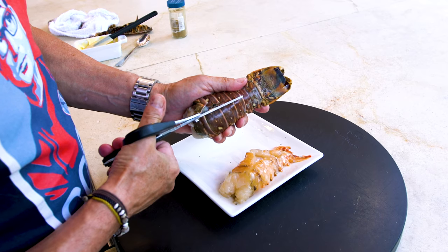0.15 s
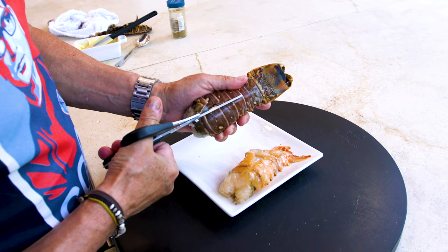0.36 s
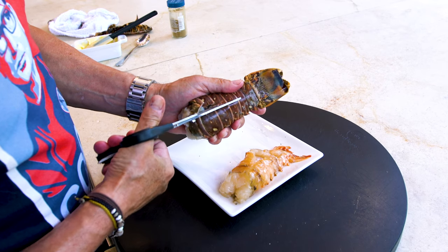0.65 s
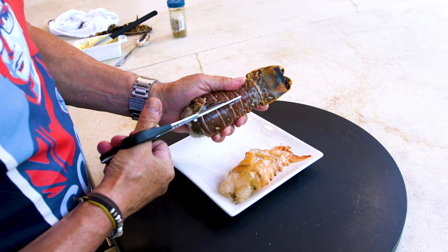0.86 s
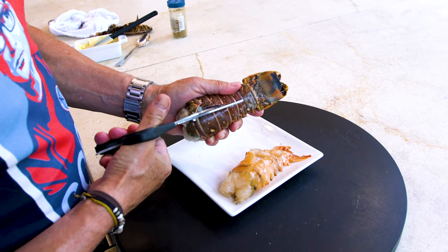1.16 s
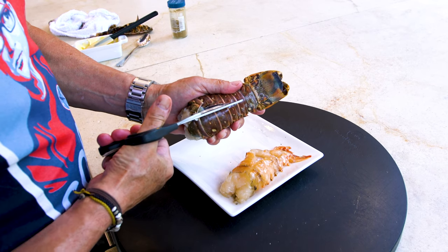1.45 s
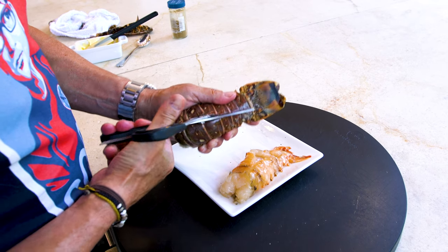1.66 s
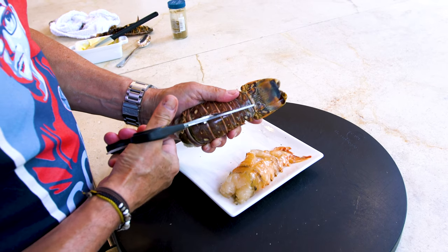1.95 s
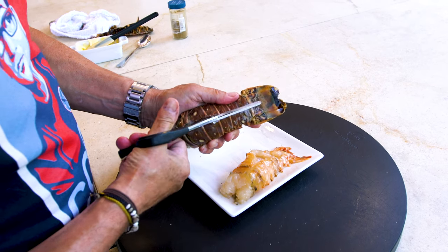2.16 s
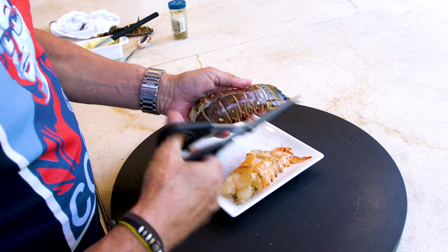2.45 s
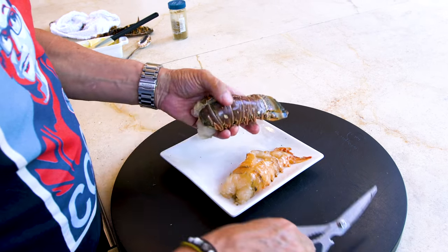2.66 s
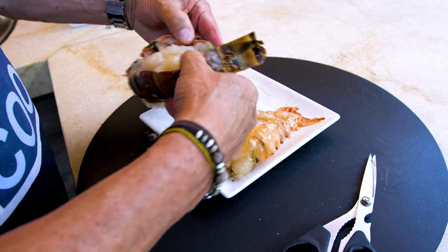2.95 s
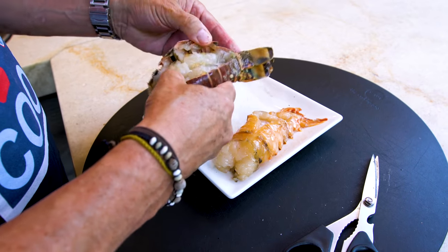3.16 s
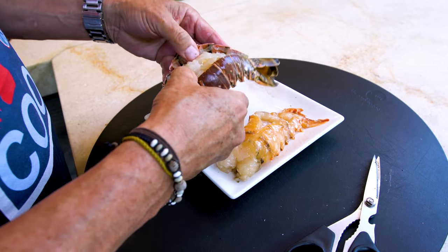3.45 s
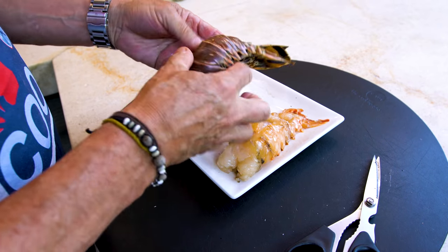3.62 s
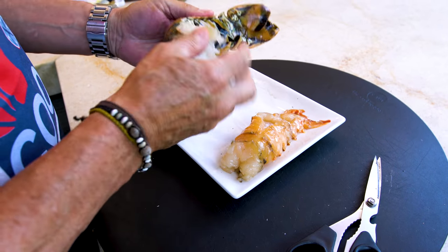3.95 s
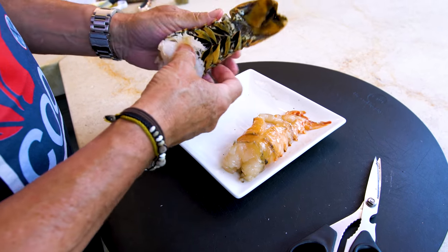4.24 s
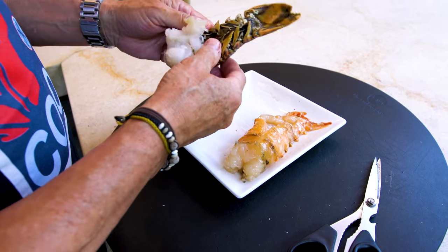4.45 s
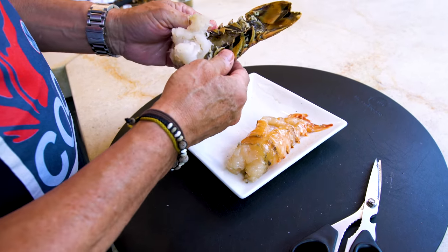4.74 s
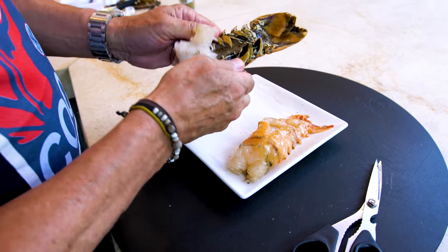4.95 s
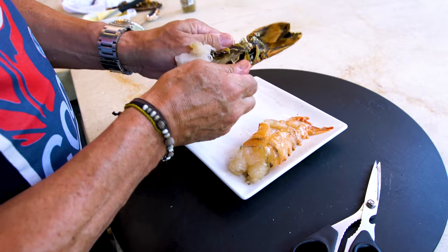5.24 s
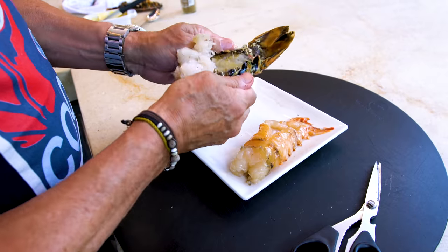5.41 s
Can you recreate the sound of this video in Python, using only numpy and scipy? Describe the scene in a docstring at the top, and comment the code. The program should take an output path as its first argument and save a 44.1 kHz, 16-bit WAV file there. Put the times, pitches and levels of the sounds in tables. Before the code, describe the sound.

Kitchen shears crunch through a hard lobster shell in sharp irregular cracks, then fingers pry it with faint ticks as a low motor hum swells.

```python
"""Opening a hard shell in the kitchen

Kitchen shears bite through a hard shell, then fingers pry it open, close to the microphone in a quiet kitchen.
The shell gives way in short bursts: random clicks make the shell's resonances ring, and reflections follow.
Under each effort it creaks and ticks faintly, from filtered random grains and very weak cracks.
A motor hum, built from steady sine tones, grows louder half way; filtered noise is the room's rumble and hiss.
"""
import sys
import numpy as np
from scipy import signal
from scipy.io import wavfile

SR = 44100
rng = np.random.default_rng(int(sys.argv[2]) if len(sys.argv) > 2 else 0)


def wav_record(signal):
    """Record a signal, one row per channel, as 16-bit PCM in the file named by sys.argv[1]."""
    frames = np.transpose(np.atleast_2d(signal))
    bounded = np.clip(frames, -1, 1)
    # unit amplitude maps onto the largest positive 16-bit level
    quanta = np.round(bounded * 32767).astype(np.int16)
    wavfile.write(sys.argv[1], SR, quanta)


N = 246033
TIME_S = np.arange(N) / SR
SHEARS_DOWN_S = 2.45   # the shears are laid aside; fingers pry from here on


def from_db(db):
    """Turn a level in dB into a factor to multiply a sound by."""
    return 10 ** (np.asarray(db) / 20)


def rms_one(x):
    """Scale a signal to an rms (average strength) of 1."""
    return x / np.sqrt(np.mean(x ** 2) + 1e-20)


def band(x, low_hz, high_hz, order=2):
    """Keep only the pitches between two limits, with a Butterworth filter."""
    return signal.sosfilt(signal.butter(order, [low_hz, high_hz], "band", fs=SR, output="sos"), x)


def drift(rate_hz):
    """A slow random wander of rms 1: smoothed noise, made at every 40th sample and joined by lines."""
    r = np.exp(-80 * np.pi * rate_hz / SR)
    noise = rng.standard_normal(N // 40 + 2002)
    slow = signal.lfilter([1], [1, -2 * r, r * r], noise)[2000:]   # drop the filter's start-up
    return np.interp(np.arange(N) / 40, np.arange(len(slow)), rms_one(slow))


def grains(size, per_s, spread_db):
    """Clicks at random moments, of uneven size and random sign."""
    born = rng.random(size) < per_s / SR
    sizes = from_db(spread_db * np.minimum(rng.exponential(1, size), 4))
    return born * sizes * rng.choice([-1, 1], size) + 1e-18


def cut_then_pried(cut_db, pried_db):
    """One level while the shears cut, another while the fingers pry."""
    return np.where(TIME_S < SHEARS_DOWN_S, cut_db, pried_db)


# balance of low and high pitches in the room's air: (frequency [Hz], relative level [dB per Hz])
AIR_BALANCE = [(18, 0.5), (30, -18.5), (60, -5.5), (85, -1.5), (130, -5.5), (250, -9), (500, -14),
               (1000, -19), (2000, -27.5), (3000, -37.5), (6000, -39), (9000, -44.5), (13000, -50)]


def air(level_db, top_hz, above_top_db, patchy_db):
    """Room rumble and hiss: noise in half-octave bands, each flickering a little, thinner above a top."""
    white = rng.standard_normal((2, N))   # neighbouring bands take different noise
    hz, balance_db = np.transpose(AIR_BALANCE)
    edges_hz = 20 * 2 ** np.arange(0, 9.6, .5)
    noise = 0
    for k, (low_hz, high_hz) in enumerate(zip(edges_hz, edges_hz[1:])):
        middle = np.log(low_hz * high_hz) / 2
        gain_db = np.interp(middle, np.log(hz), balance_db) + patchy_db * drift(0.58)
        noise = noise + from_db(gain_db) * band(white[k % 2], low_hz, high_hz)
    below = signal.sosfiltfilt(signal.butter(8, top_hz, fs=SR, output="sos"), noise)
    return from_db(level_db) * rms_one(below + from_db(above_top_db) * (noise - below))


# loudness of the whole hum, before each tone's own level is added: (time [s], level [dB])
MOTOR_LEVEL = [(0, -69), (1.4, -71.5), (2.81, -76), (2.87, -60), (4.0, -60), (4.6, -60), (5.2, -62.5),
               (5.58, -66.5)]
# the steady tones of the hum: (frequency [Hz], level over the hum level [dB])
MOTOR_TONES = [(80.6, -11), (161.1, 3), (241.7, -8), (322.3, -12.5), (480, -15.5)]


def motor():
    """An appliance motor: steady sine tones whose strengths waver a little."""
    hum_db = np.interp(TIME_S, *np.transpose(MOTOR_LEVEL))
    hum = 0
    for hz, tone_db in MOTOR_TONES:
        strength = from_db(tone_db + 0.4 * drift(6))
        hum = hum + strength * np.sin(2 * np.pi * hz * TIME_S + rng.uniform(0, 2 * np.pi))
    return np.sqrt(2) * from_db(hum_db) * hum   # a sine's rms is its peak / sqrt(2)


REST_DB = -86   # faint level between efforts
# the hands strain on the shell: (time of full strength [s], time held [s], level [dB])
HAND_EFFORTS = [(0.0, 0.15, -78.5), (0.2, 0.098, -70.5), (0.392, .09, -69), (0.58, 0.19, -78),
                (0.788, 0.036, -64.5), (1.0, 0.08, -75.5), (1.299, 0.074, -71.5), (1.442, 0.024, -72),
                (1.691, 0.06, -62.5), (2.06, .06, -65), (2.128, 0.043, -57), (2.238, 0.066, -71.5),
                (2.47, 0.11, -77), (2.848, 0.14, -75.5), (3.102, 0.16, -79), (3.379, 0.12, -74),
                (3.57, .09, -75.5), (3.72, 0.15, -85), (3.917, 0.06, -79), (4.101, 0.089, -75),
                (4.412, 0.11, -74.5), (4.6, 0.091, -85), (4.78, .07, -80.5), (4.947, 0.2, -76),
                (5.31, 0.074, -71), (5.41, .05, -69.5), (5.48, 0.06, -67)]


def effort_db():
    """Each effort rises, is held and falls back to a faint rest level."""
    rise_db_per_s, fall_db_per_s = 423, 259
    out = np.full(N, float(REST_DB))
    for s, held_s, level_db in HAND_EFFORTS:
        before_db = rise_db_per_s * np.maximum(s - TIME_S, 0)
        after_db = fall_db_per_s * np.maximum(TIME_S - s - held_s, 0)
        out = np.maximum(out, level_db - before_db - after_db)
    return out


# creaking grains by size: (low edge [Hz], high edge [Hz], level over the effort [dB])
GRAIN_BANDS = [(1230, 1845, -10.5), (1800, 3000, -3.5), (3200, 4850, -5), (4650, 7000, -3.5)]


def creak(fine_cut_db, fine_pried_db):
    """Fine grains of shell and wet flesh moving; each size has clumps of its own that come and go."""
    shared = drift(18)
    finest = (7120, 12000, cut_then_pried(fine_cut_db, fine_pried_db))
    out = 0
    for low_hz, high_hz, level_db in GRAIN_BANDS + [finest]:
        clumps = from_db(2.5 * shared + 3.5 * drift(40))
        rustle = band(grains(N, 2500, 4.5) * clumps, low_hz, high_hz, order=3)
        out = out + from_db(level_db) * rms_one(rustle)
    return from_db(effort_db()) * out


def ticks(count, middle_db, spread_db, length_ms):
    """Rows of faint cracks at random moments, likelier under effort, laid out like the crack table."""
    odds = np.cumsum(np.clip(effort_db() - REST_DB, 0, 12) + 1)
    when, low, mid, high, size, body, splinters = rng.random((count, 7)).T
    s = np.interp(when * odds[-1], odds, TIME_S)
    pitches_hz = 1400 * 2 ** low, 3300 * 2 ** mid, 7500 * 1.7 ** high
    edge_db = middle_db + spread_db * (2 * size - 1)
    same = np.ones(count)
    return list(zip(s, length_ms * same, *pitches_hz, edge_db,
                    -20 * same, 6 - 24 * body, 6 - 24 * splinters))


# the pitches at which the shell rings, before each crack changes them:
# (frequency [Hz], width [Hz], kept within 330 to 1100 when played, level [dB])
SHELL_RESONANCES = [(1250, 290, -20.5), (1640, 310, -1.5), (1856, 270, 6), (2500, 294, 3), (2740, 510, 7),
                    (3660, 540, 9), (4020, 1400, -6), (4870, 680, 6), (5410, 1400, 2.5), (7090, 1900, 4),
                    (7990, 895, 5), (8600, 590, -30), (9580, 170, 2), (10270, 990, 7), (13600, 1800, -14)]


def shell(x, strengths_db, shifts, direct):
    """The shell's resonances ring side by side, with a share of the bare click."""
    out = direct * signal.lfilter([.5, .5], 1, x)
    for (hz, width_hz, level_db), strength_db, shift in zip(SHELL_RESONANCES, strengths_db, shifts):
        r = np.exp(-np.pi * np.clip(width_hz, 330, 1100) / SR)   # a wider resonance dies sooner
        b = np.sqrt(1 - r * r) * np.array([1, 0, -1]) / 2
        a = [1, -2 * r * np.cos(2 * np.pi * hz * shift / SR), r * r]
        out = out + from_db(level_db + strength_db) * signal.lfilter(b, a, x)
    return out


# the shell gives way: (time [s], length [ms], body pitch [Hz], edge pitch [Hz], splinter pitch [Hz],
# edge level [dB], knock over edge [dB], body over edge [dB], splinters over edge [dB])
SHELL_CRACKS = [(0.0945, 3, 2840, 4600, 8050, -59, -15.0, 0, -29),
                (0.1952, 0.72, 1310, 4600, 11530, -58, -15.0, -10, -1),
                (0.2052, 1.3, 2290, 6000, 7890, -60, -16.0, -1, 5.5),
                (0.2092, 0.8, 2410, 5740, 8130, -62.5, -17, 3, 3.5),
                (0.2196, 4.9, 1640, 5680, 11800, -66.5, -10, 3, 4),
                (0.246, 3.5, 1750, 5030, 7920, -58, -18.0, -19.5, -6.0),
                (0.279, 1.8, 1790, 5890, 8540, -68, -15.0, 3, 4),
                (0.308, 1.26, 2050, 6150, 9240, -45, -24.5, -7, -6),
                (0.341, 3.5, 2700, 5800, 8500, -48.5, -26, -7, -4.5),
                (0.376, 2.64, 2860, 3450, 9300, -37.5, -16, 0.5, -4),
                (0.3789, 2.3, 2870, 5860, 11860, -41.5, -10.5, -2.5, 1),
                (0.399, 2.0, 2820, 5900, 8450, -45, -34, -8, -8),
                (0.4036, 1.5, 2270, 3760, 8500, -55, -28, 2.0, 5),
                (0.408, 3.0, 2790, 3950, 10770, -62, -18.0, -5, 4),
                (0.431, 3.9, 3030, 5500, 10840, -39.5, -44, -4.5, -4.5),
                (0.4762, 2.1, 1730, 4750, 9200, -55, -16, -3, -5),
                (0.5813, 1.5, 1690, 4340, 8480, -68.5, -17, 13, -4),
                (0.724, 2.2, 2440, 5430, 8140, -66, -15.0, 5, -16.5),
                (0.7673, 2.5, 1520, 5800, 8660, -43, -6, -4.5, -1.5),
                (0.7839, 1.6, 1410, 6450, 8800, -33, -27, -6.5, -6.5),
                (0.7861, 5, 1790, 6300, 12700, -38, -11.5, 3, 1),
                (0.8185, 5.5, 2680, 5900, 8800, -72, -16.5, -19, 17.5),
                (0.8331, 5.3, 2410, 4870, 9220, -34, -13.5, -0.5, 1.5),
                (0.9739, 0.73, 2070, 4960, 10500, -70.5, -15.0, 17, -19.5),
                (1.002, 1.3, 1870, 4270, 8030, -79.5, -13, 22.0, -13),
                (1.0365, 0.89, 2320, 3370, 8000, -54, -12, 2.5, -11),
                (1.056, 4.6, 1690, 5400, 7200, -49.5, -18, 1.5, -2.5),
                (1.071, 1, 1350, 3540, 7660, -53.5, -23, -9, -1),
                (1.165, 6.0, 1580, 6560, 9680, -86.5, -15.0, -7, 11.5),
                (1.296, 0.9, 1440, 3340, 9560, -63.5, -18, -3, 11),
                (1.3085, 5.7, 1460, 5900, 8380, -48.5, -14, 0.5, -5),
                (1.3178, 0.54, 2540, 6120, 8030, -48, -1, 4.5, -2),
                (1.321, 5.3, 1770, 3510, 9730, -60, -13, 2.0, 5),
                (1.335, 2.2, 2420, 6640, 7890, -62, -15.0, -10, 1),
                (1.3518, 1.7, 2580, 6700, 7710, -58.5, -5, 1, 0),
                (1.366, 1.2, 1040, 6140, 7810, -61.0, -15.0, -12, 2.0),
                (1.3804, 1, 2480, 6700, 7300, -44.5, -27, -11, -1),
                (1.3917, 1.1, 1260, 6440, 7710, -72.0, -15.0, -7.0, 13),
                (1.436, 0.88, 1130, 4850, 8100, -65, -15.0, -16.0, 6),
                (1.4526, 4.2, 2460, 5300, 7800, -41, -24, -4.5, -3),
                (1.5087, 2.5, 2030, 3360, 7800, -59.5, -23, -2, -11),
                (1.6126, 1.4, 990, 5560, 11010, -64.5, -1, -14.5, -6),
                (1.673, 1.7, 2800, 3420, 8200, -52, -24, 0, -9),
                (1.6803, 0.8, 1490, 5370, 12340, -71, -15.0, -5, 12),
                (1.6877, 1.0, 1100, 5280, 11800, -68.5, -15.0, -6, 10),
                (1.6984, 1.1, 1440, 6300, 9290, -63, -18.0, -1.0, 12),
                (1.7027, 0.7, 1970, 6370, 12090, -69, -17, -15.5, 9),
                (1.7057, 0.7, 2050, 6030, 7920, -74, -15.0, 0.5, 10),
                (1.712, 3.2, 1300, 5970, 8660, -46.5, -13, -5, 3),
                (1.7157, 0.97, 1960, 6500, 8900, -49.5, -18, 0, 11.5),
                (1.717, 2.2, 1890, 4750, 9000, -43.5, -22, -4, -1),
                (1.7208, 2.7, 2820, 5650, 7800, -53.5, -2, -6, 2.0),
                (1.7312, 3.1, 1320, 4820, 7710, -51.0, -13, 3, -1.0),
                (2.0484, 5, 1280, 6600, 12000, -38.5, -4, 2, 0),
                (2.055, 4.4, 2370, 4750, 8800, -35, -17.5, -3.5, -2.5),
                (2.0968, 1.6, 1360, 5400, 10100, -42.5, -15.0, -4, -7),
                (2.1217, 4.1, 1390, 6160, 8600, -36, -10, -6, -2.5),
                (2.1247, 6.8, 2900, 5950, 7600, -39.5, -19, 1.0, 0.5),
                (2.1483, 4.5, 2700, 5540, 7640, -36.5, -20, 0.5, -2),
                (2.152, 2.5, 1170, 5640, 7810, -32, -19, -13, -9),
                (2.1659, 1.4, 2590, 5800, 8300, -30.5, -33, -1, -19),
                (2.167, 4, 2440, 4340, 8700, -35.5, -27, -7, -3.5),
                (2.1709, 6.5, 2800, 5300, 8870, -45, -30, 5.5, -12),
                (2.1779, 3.2, 1950, 5210, 7850, -41, -33.5, -5, -6.0),
                (2.182, 2.9, 1800, 5700, 7900, -41, -36, -12, -21),
                (2.189, 3.2, 1800, 3970, 7710, -49, -27.5, -10, -17),
                (2.2588, 1.13, 2000, 3640, 12900, -50.5, -26.0, -6, -5),
                (2.3557, 12.4, 2370, 5500, 8800, -51, -14, 5.5, -4),
                (2.3778, 1.6, 2350, 3310, 7710, -55, -18, 6, -4.0),
                (2.3825, 5.1, 2420, 6000, 7710, -58.5, -22, 1, -10),
                (2.8506, 0.85, 1270, 3660, 7710, -71.5, -12, 11, 3),
                (2.94, 4.0, 2450, 3460, 10900, -61.5, -1, -1.0, -3),
                (3.1395, 2.3, 1180, 3410, 10150, -78, -18, 13, -6),
                (3.39, 2.0, 990, 4230, 8340, -75.5, -15.0, 12.5, -6),
                (3.4897, 0.91, 1384, 3310, 13280, -68, -14, 6, 0.0),
                (3.581, 2.4, 1060, 5200, 8450, -65, -15.0, -6, -3.5),
                (3.6294, 6.0, 2670, 3380, 8300, -73, -15.0, 9.5, -1),
                (3.6463, 2.4, 1060, 3560, 12000, -71.5, -15.0, 11, 3),
                (3.738, 1.6, 990, 5840, 8660, -65.5, 4, -10, -3),
                (3.8324, 1.4, 1350, 4570, 12250, -82, -14, 10, 15),
                (3.9248, 0.56, 2000, 3570, 8320, -61, -14, 5.5, -12),
                (3.9583, 1.5, 990, 6250, 11400, -60.5, -12, -4, -1),
                (4.0448, 1.3, 990, 6200, 11800, -73.5, -15.0, 11, 11),
                (4.0588, 1.6, 1830, 4520, 7860, -74.5, -18, 18, -11),
                (4.1046, 0.83, 2030, 3740, 8230, -57.5, -20, 1.5, -2),
                (4.1565, 3.3, 1980, 3650, 7800, -64.5, -12, 0, -13),
                (4.285, 2.6, 990, 6240, 13080, -73.5, -15.0, 1, 0),
                (4.4046, 1.2, 990, 5730, 7710, -64, -15.0, 0, -18),
                (4.4115, 1.7, 1300, 5120, 8520, -65.5, -13, -1.0, -12.0),
                (4.421, 4.7, 1280, 6270, 10990, -72.5, -14, -7, 8),
                (4.4422, 0.6, 1290, 4910, 7800, -58.0, -19.5, -6, -21),
                (4.4575, 0.6, 990, 4820, 8960, -65.0, -15.0, -14.5, -16.0),
                (4.501, 0.45, 2760, 4840, 8800, -55, -21, -11, -14),
                (4.5271, 0.63, 1630, 4660, 7800, -56.5, -21, 2.5, -16),
                (4.5522, 0.55, 990, 5090, 7500, -52.5, -23, -19.5, -24),
                (4.6128, 0.96, 2550, 3900, 8350, -59.5, -6, -3, -25),
                (4.6265, 0.8, 1700, 3930, 7710, -60, -17.0, -3.0, -19.5),
                (4.6394, 0.7, 990, 5600, 12460, -59.5, -22, -20.5, -21.5),
                (4.6595, 0.6, 996, 4510, 12500, -59.5, -16, -16, -25.5),
                (4.6771, 1.1, 2350, 6040, 7800, -63, -14, 4.5, -20),
                (4.7163, 1.2, 970, 3530, 11990, -94, -15.0, 6, 19),
                (4.8363, 0.7, 2310, 5500, 8700, -61, -15.0, 4, -19),
                (5.0257, 2.5, 2000, 4070, 8630, -70.5, -16, 10, -27),
                (5.1004, 1.7, 980, 3820, 7800, -73, -20, 7, -28),
                (5.2929, 0.84, 1670, 4700, 8000, -50.5, -22, 6.5, -29),
                (5.3139, 1.95, 1670, 5600, 7800, -38.5, -27.0, 0, -11.5),
                (5.336, 5.8, 1430, 5880, 7710, -62.5, -13, 2, -12),
                (5.3449, 1.0, 2020, 3310, 7710, -59.5, -20, 7.5, -16),
                (5.3619, 0.8, 2840, 3310, 7710, -63, -15.5, 8, -18),
                (5.3706, 1.2, 2840, 3310, 7710, -69, -15.0, 11, -20.5),
                (5.402, 2.6, 1590, 4010, 7710, -80.5, -15.0, 14, -7.5),
                (5.4163, 1.8, 1920, 3310, 8200, -71.5, -15.0, 14.5, -19.0),
                (5.427, 2.2, 2720, 5680, 7920, -63, -15.0, 3, -14.0),
                (5.4453, 4.2, 1380, 3310, 8850, -68, -17, 7, -13),
                (5.464, 5, 1710, 3420, 7710, -71, -15.0, 17, -14.0),
                (5.4895, 0.93, 1540, 4200, 8600, -63, -16, 11.5, -23.5),
                (5.506, 1.3, 2000, 4150, 8320, -60, -18, 6, -16.0),
                (5.513, 1.3, 1510, 4200, 11740, -54.5, -21, 9, -15),
                (5.5242, 2.7, 1960, 5600, 8200, -52, -19, -2, -23),
                (5.546, 1.4, 1750, 5850, 7710, -80.0, -15.0, 20, -6.0),
                (5.569, 1.8, 1950, 6470, 7650, -52.5, -22, 1, -17),
                (5.5728, 1.1, 1940, 5240, 7800, -45, -26, 5, -14)]
# parts of a crack, in the order knock, body, edge, splinters: (low edge [Hz], high edge [Hz])
CRACK_PARTS = [(350, 800), (950, 3000), (3000, 7000), (7000, 14500)]


def cracks(swell, lead, lead_share, fall_ms, direct, off_pitch_db, on_pitch_db):
    """Each crack: a short swell of clicks, a dense burst of snaps, a quick fall."""
    before, size = 400, 1500   # samples ahead of the first snap, and in all
    shift_share = .07   # the resonances shift at random from crack to crack, so no two ring alike
    splinter_reach = 1.55   # a crack fades above this multiple of its splinter pitch
    out = np.zeros(N + size + before)
    ms = (np.arange(size) - before) * 1000 / SR
    shell_hz, _, shell_db = np.transpose(SHELL_RESONANCES)
    filters = [signal.butter(3, edges_hz, "band", fs=SR, output="sos") for edges_hz in CRACK_PARTS]
    faint = ticks(count=30, middle_db=-74, spread_db=3, length_ms=1.5)
    for s, length_ms, *pitches_hz, edge_db, knock_db, body_db, splinters_db in SHELL_CRACKS + faint:
        # a long crack swells and ebbs as it runs
        arch = 1 - swell * np.cos(2 * np.pi * np.clip(ms / length_ms, 0, 1)) * min(length_ms / 8, 1)
        shape = arch * np.exp(-np.maximum(ms - length_ms, 0) / fall_ms)
        lead_in = np.exp(ms / (lead_share * max(length_ms, 3)))
        shape = np.where(ms < 0, lead * np.clip(length_ms / 4, .3, 1) * lead_in, shape)
        force = grains(size, per_s=16000, spread_db=4.2)
        force[before] = 3 + 15 / length_ms   # the first snap is nearly all of a short tick
        blow = force * shape

        # the pieces that break ring clearest, their neighbours less the further off they lie
        octaves = abs(np.log2(shell_hz / np.array(pitches_hz)[:, None]))
        strengths_db = -off_pitch_db * octaves.min(axis=0) + 3 * rng.standard_normal(len(shell_hz))
        shifts = 1 + shift_share * rng.uniform(-1, 1, len(shell_hz))
        nearest = octaves.argmin(axis=1)
        shifts[nearest] = pitches_hz / shell_hz[nearest]
        strengths_db[nearest] = on_pitch_db - shell_db[nearest]
        ringing = shell(blow, strengths_db, shifts, direct)
        top_hz = min(splinter_reach * pitches_hz[-1], 15000)
        ringing = signal.sosfilt(signal.butter(3, top_hz, fs=SR, output="sos"), ringing)

        # set the level of each part by its strength during the burst
        at = round(s * SR)
        levels_db = edge_db + np.array((knock_db, body_db, 0, splinters_db))
        for sos, (low_hz, _), level_db in zip(filters, CRACK_PARTS, levels_db):
            part = signal.sosfilt(sos, ringing if low_hz > 500 else blow)   # the knock is the bare blow
            burst = (ms > 0) & (ms < max(length_ms + .4, 1000 / low_hz))
            out[at:at + size] += from_db(level_db) * part / np.sqrt(np.mean(part[burst] ** 2))
    return out[before:before + N]


def push(crack, cut_db, pried_db):
    """A low push that follows each crack's size, then swings back, stronger while the blades cut."""
    size = np.abs(crack) * from_db(cut_then_pried(cut_db, pried_db))
    return band(size, 28.08, 350, order=1)


def kitchen(x, early_db, early_t60, late_db, late_t60):
    """Dense reflections: a quick cloud from table and hands, a fainter, longer one from the walls."""
    t = np.arange(12000) / SR
    early = from_db(early_db - 60 * t / early_t60)   # t60: seconds to fall by 60 dB
    late = from_db(late_db - 60 * t / late_t60)
    echoes = band(rng.standard_normal(len(t)), 2800, 13500, order=1) * (early + late)
    return signal.fftconvolve(x, echoes)[:N]


def scene():
    """All sources added up at one microphone."""
    background = air(level_db=-60, top_hz=12030, above_top_db=-20, patchy_db=0.4) + motor()
    creaking = creak(fine_cut_db=-7, fine_pried_db=-10.5)
    crack = cracks(swell=0.67, lead=0.56, lead_share=0.61, fall_ms=0.75,
                   direct=0.0393, off_pitch_db=13, on_pitch_db=10)
    low_push = push(crack, cut_db=-4.0, pried_db=-15)
    room = kitchen(crack, early_db=-31.0, early_t60=0.053, late_db=-52.5, late_t60=0.21)
    return (background + creaking + crack + low_push + room)[None]


def record(dry):
    """Cut the highest treble: a steep filter takes off at least 60 dB from 16500 Hz up."""
    return signal.sosfilt(signal.cheby2(12, 60, 16500, fs=SR, output="sos"), dry)


dry = scene()
out = record(dry)
wav_record(out)
```